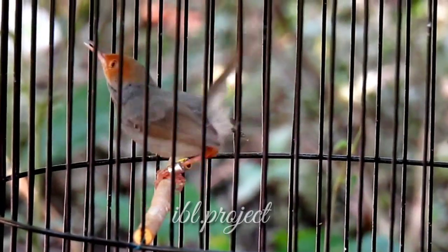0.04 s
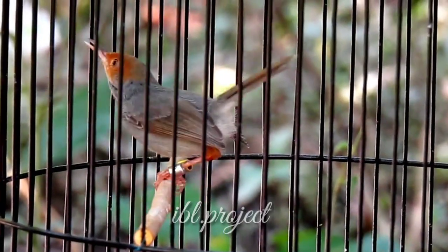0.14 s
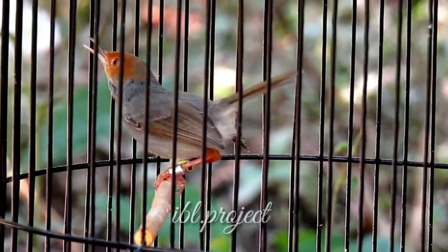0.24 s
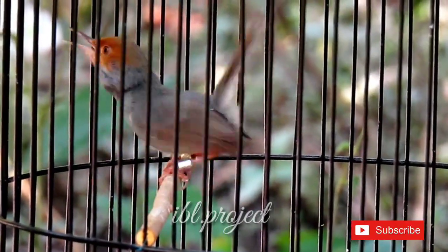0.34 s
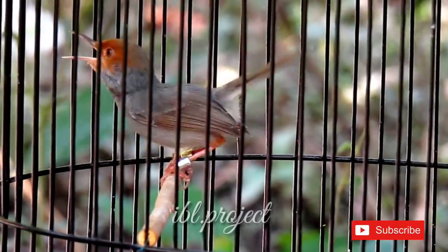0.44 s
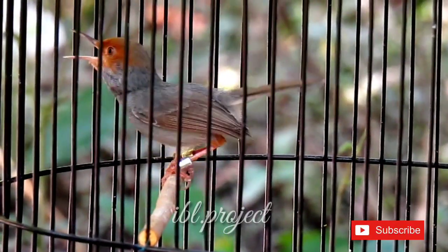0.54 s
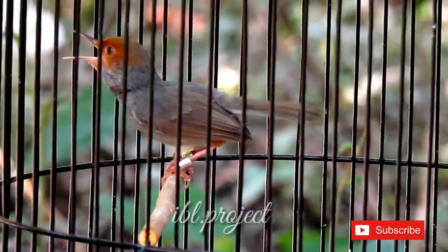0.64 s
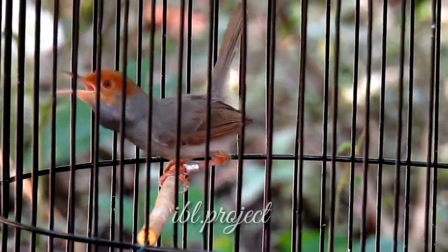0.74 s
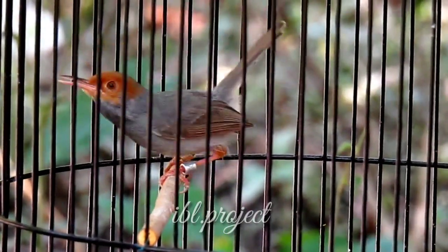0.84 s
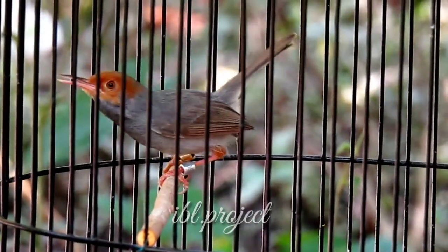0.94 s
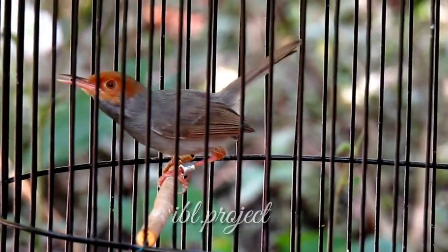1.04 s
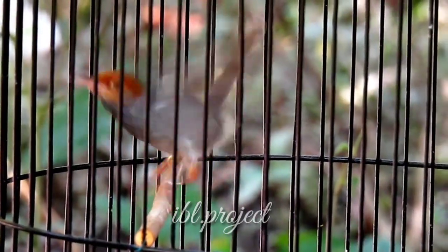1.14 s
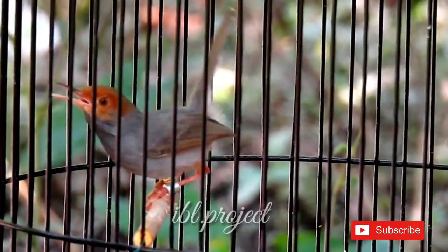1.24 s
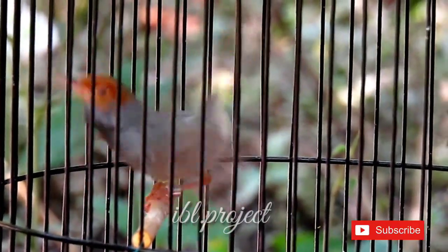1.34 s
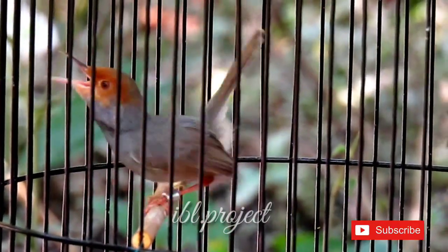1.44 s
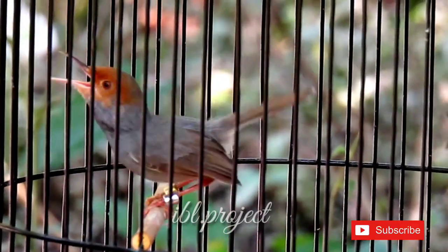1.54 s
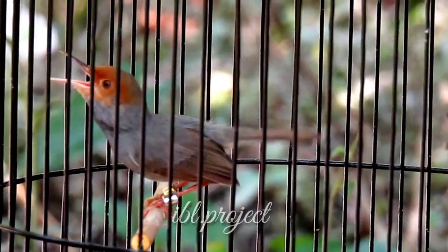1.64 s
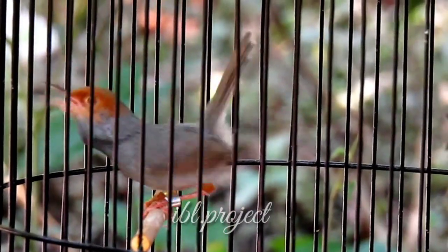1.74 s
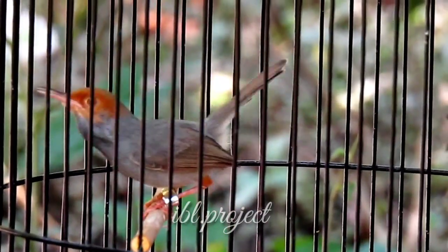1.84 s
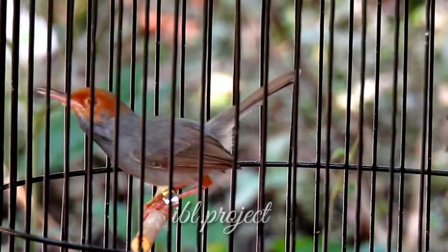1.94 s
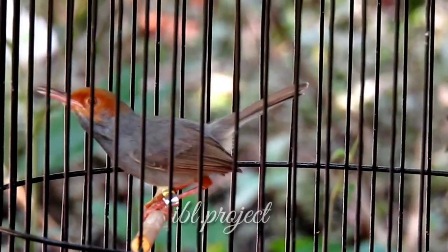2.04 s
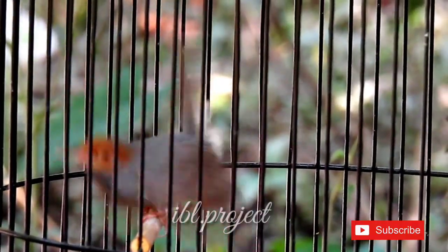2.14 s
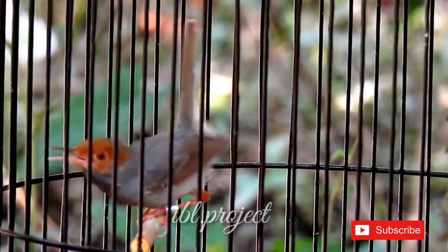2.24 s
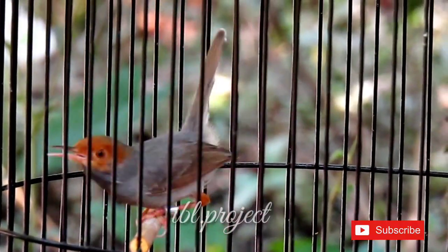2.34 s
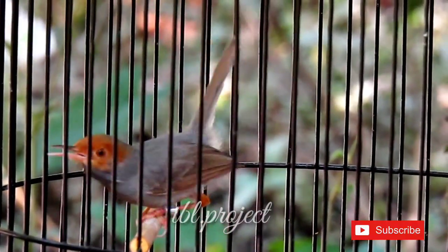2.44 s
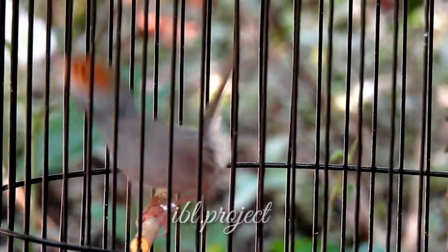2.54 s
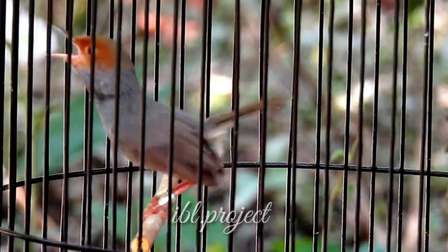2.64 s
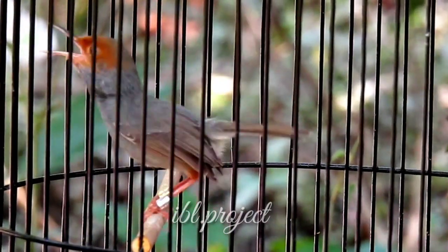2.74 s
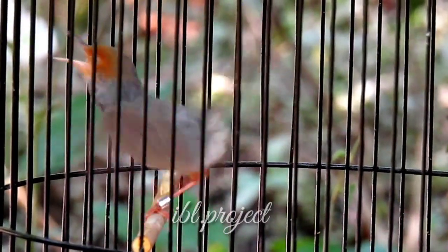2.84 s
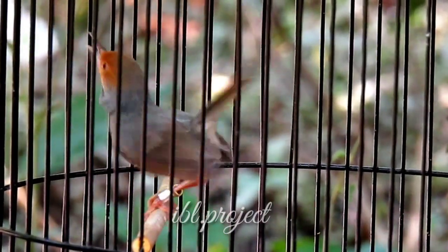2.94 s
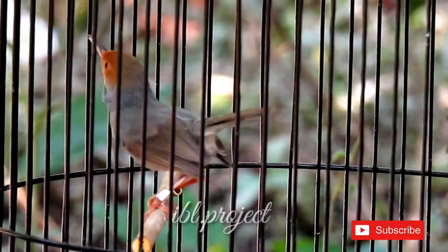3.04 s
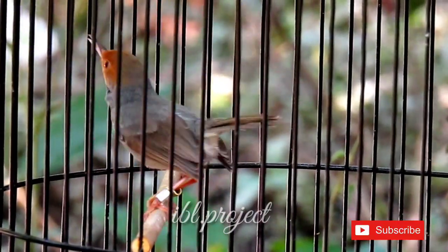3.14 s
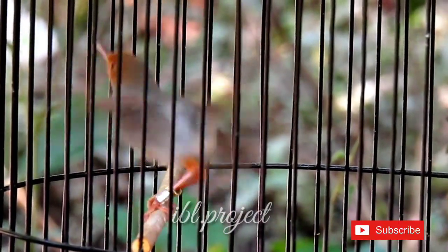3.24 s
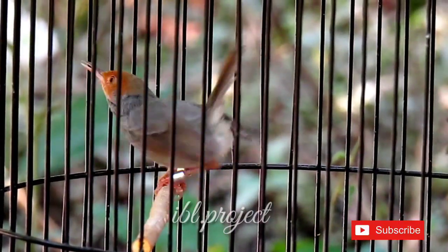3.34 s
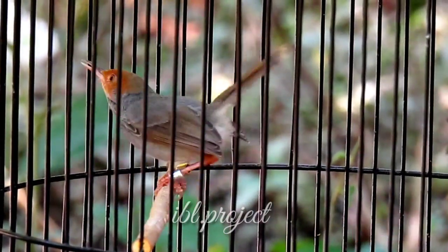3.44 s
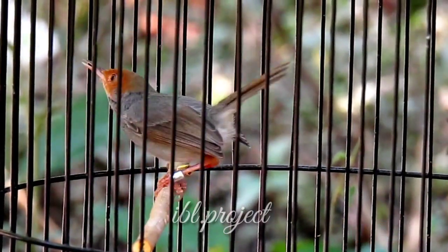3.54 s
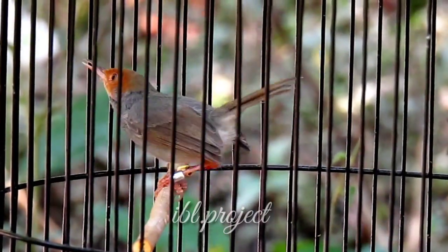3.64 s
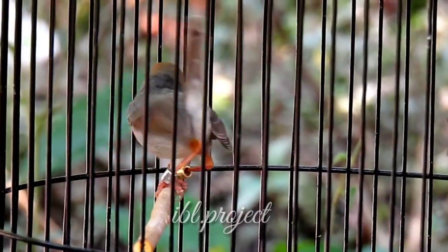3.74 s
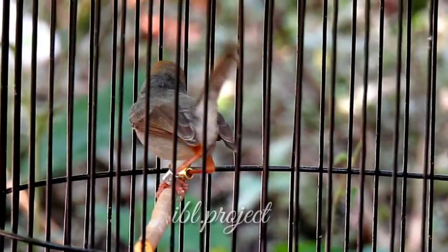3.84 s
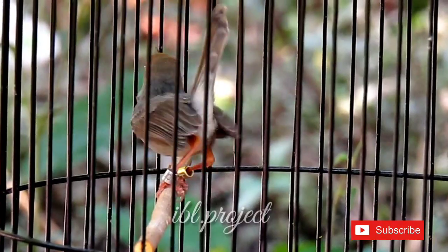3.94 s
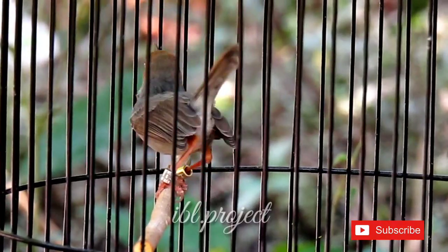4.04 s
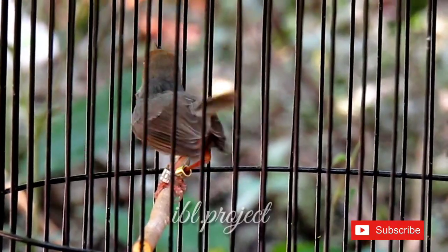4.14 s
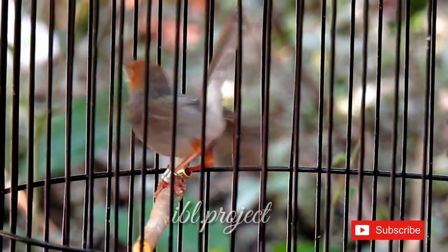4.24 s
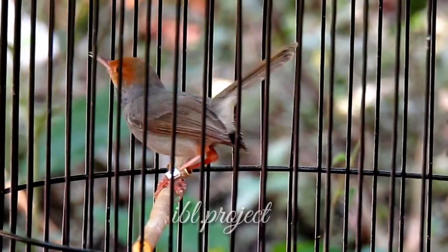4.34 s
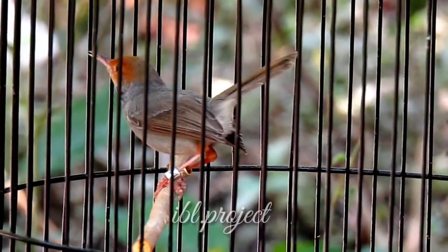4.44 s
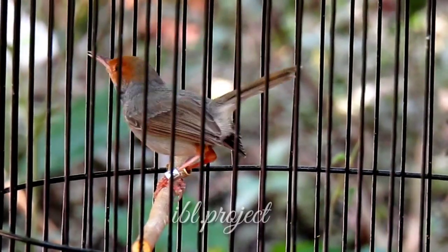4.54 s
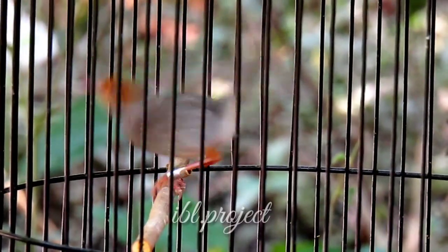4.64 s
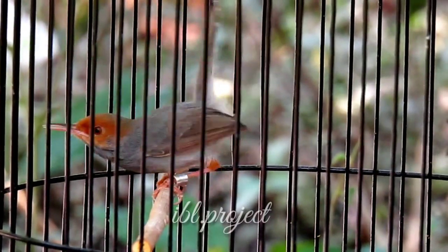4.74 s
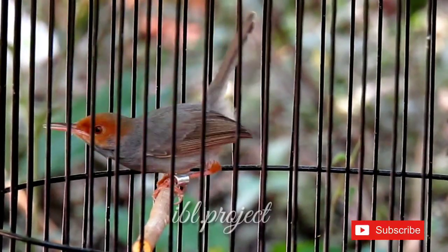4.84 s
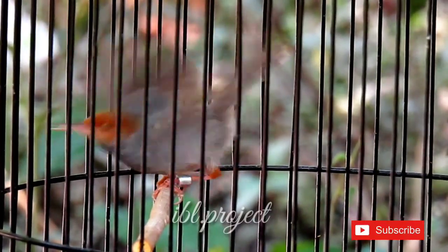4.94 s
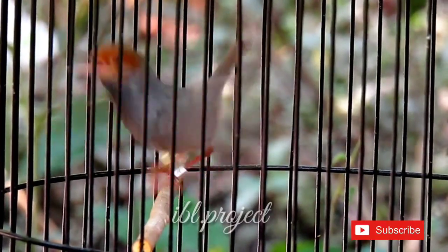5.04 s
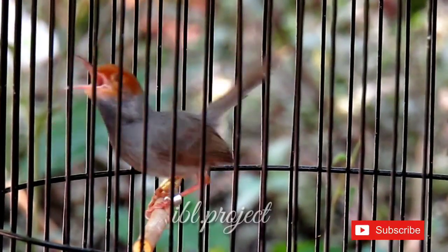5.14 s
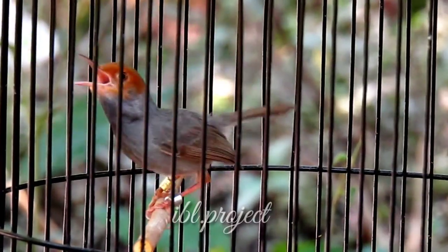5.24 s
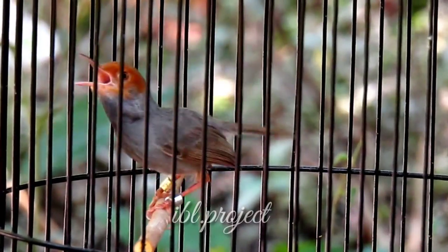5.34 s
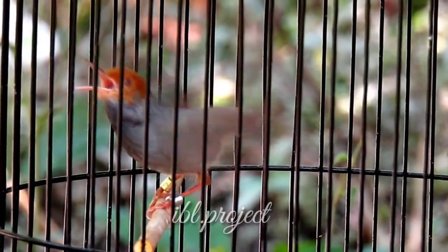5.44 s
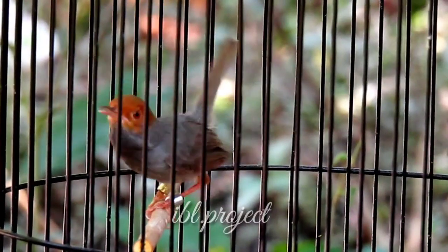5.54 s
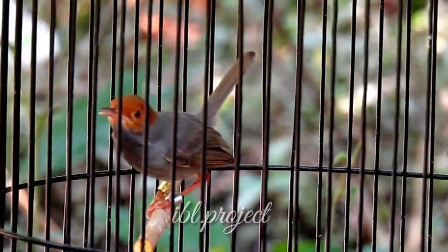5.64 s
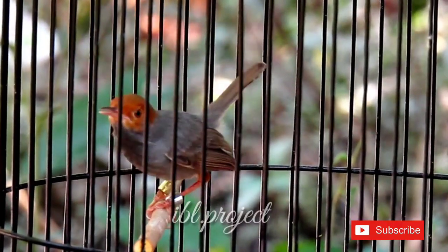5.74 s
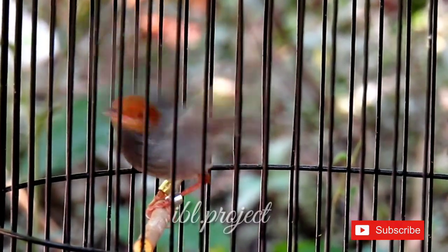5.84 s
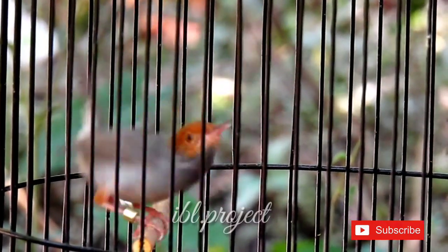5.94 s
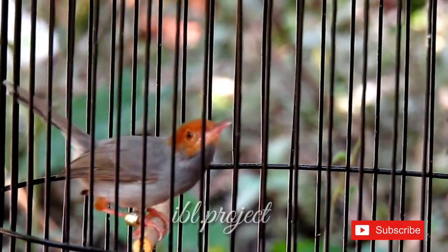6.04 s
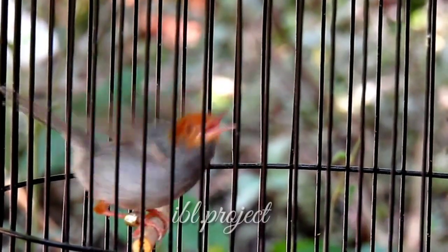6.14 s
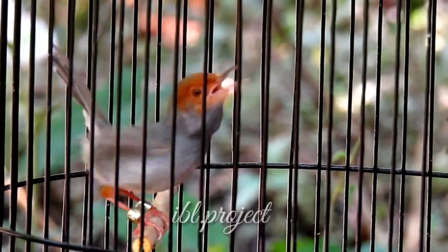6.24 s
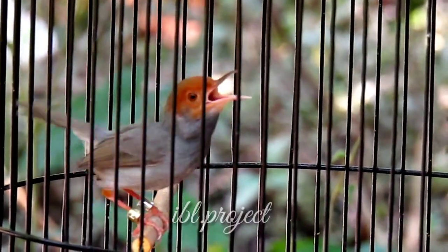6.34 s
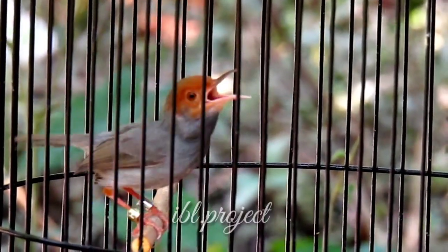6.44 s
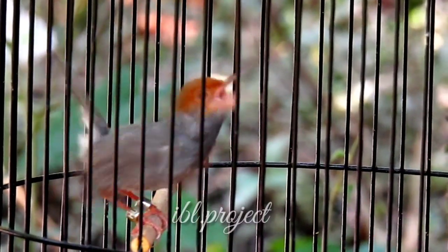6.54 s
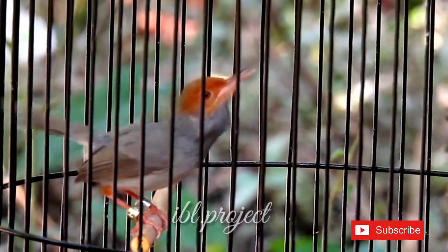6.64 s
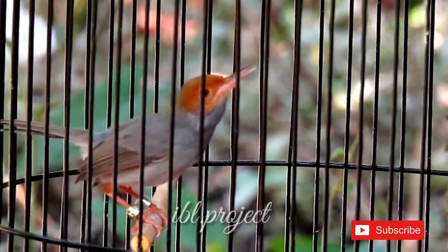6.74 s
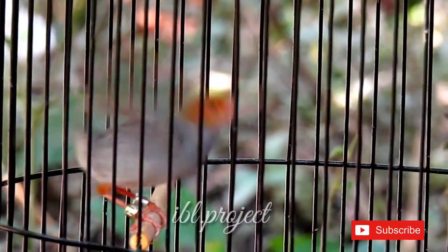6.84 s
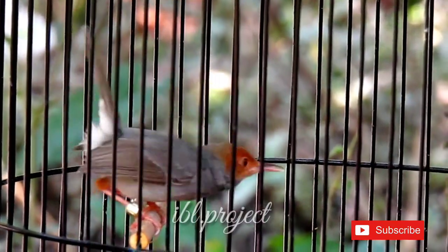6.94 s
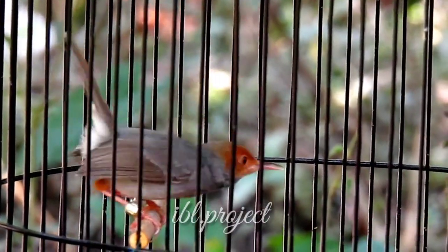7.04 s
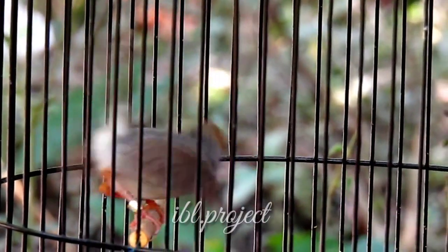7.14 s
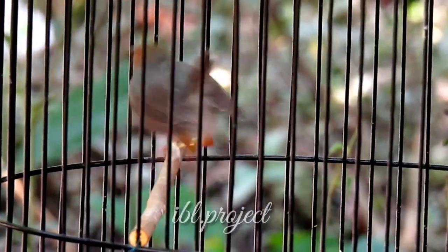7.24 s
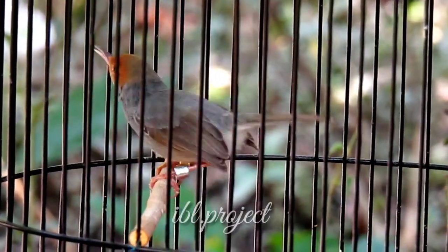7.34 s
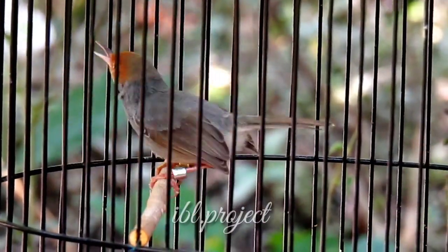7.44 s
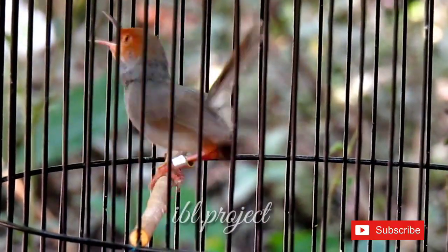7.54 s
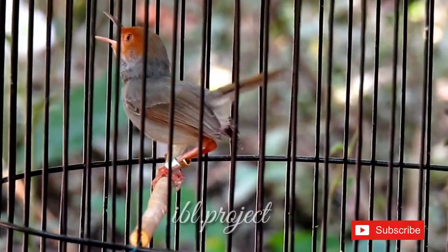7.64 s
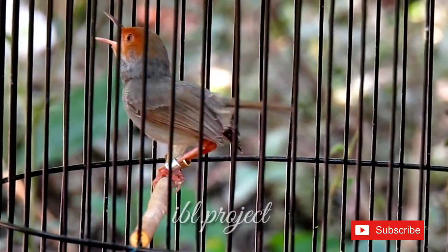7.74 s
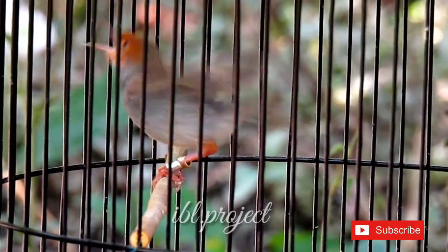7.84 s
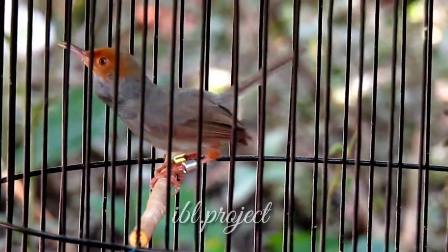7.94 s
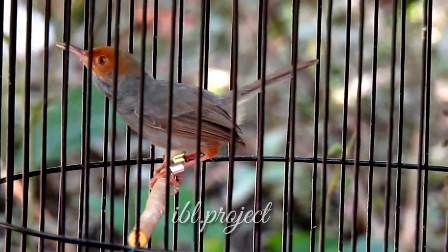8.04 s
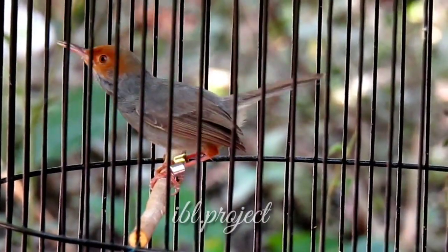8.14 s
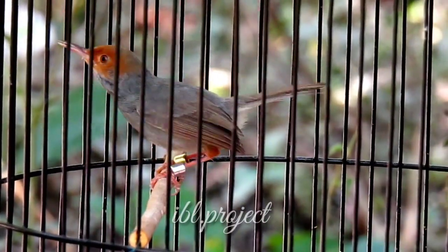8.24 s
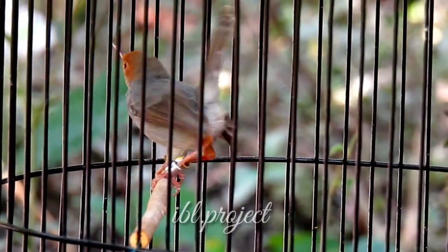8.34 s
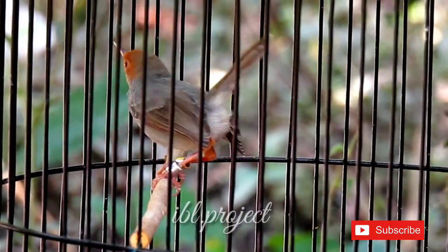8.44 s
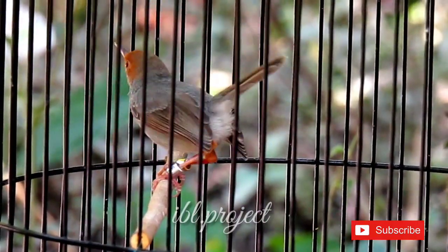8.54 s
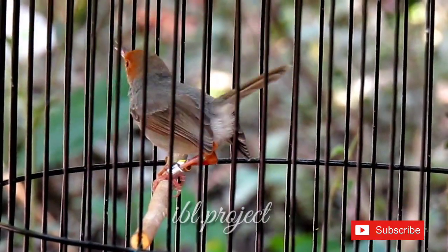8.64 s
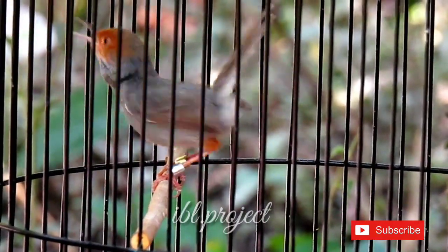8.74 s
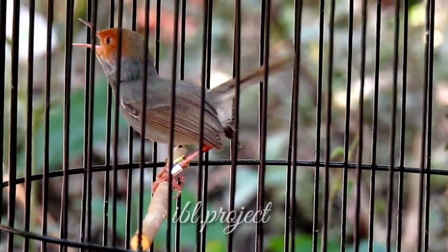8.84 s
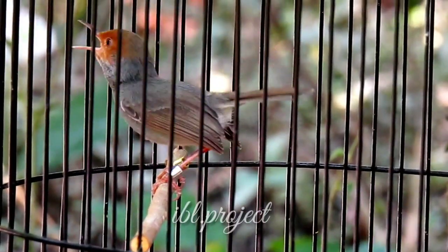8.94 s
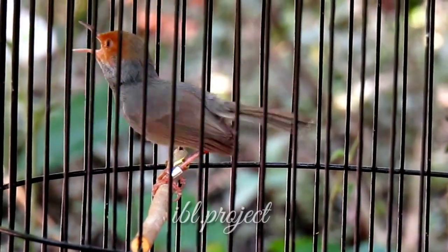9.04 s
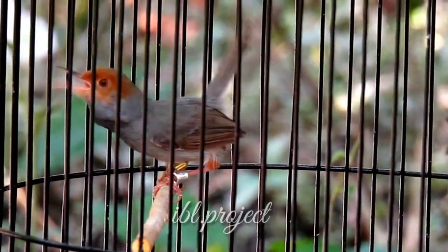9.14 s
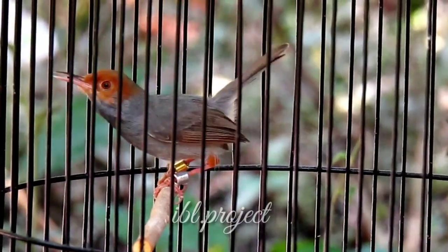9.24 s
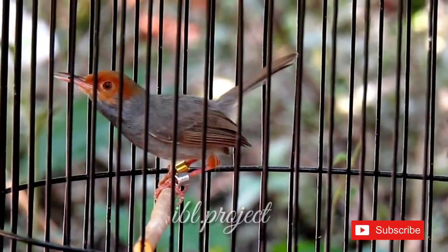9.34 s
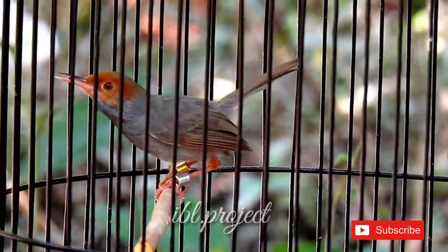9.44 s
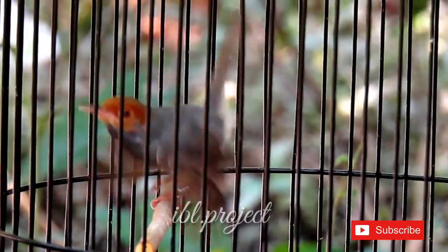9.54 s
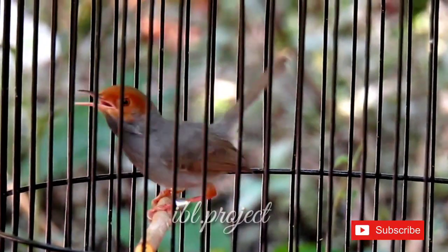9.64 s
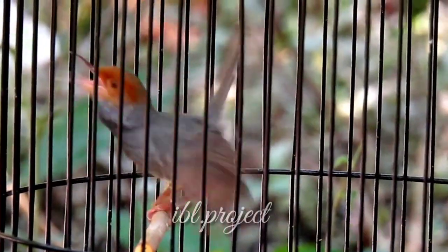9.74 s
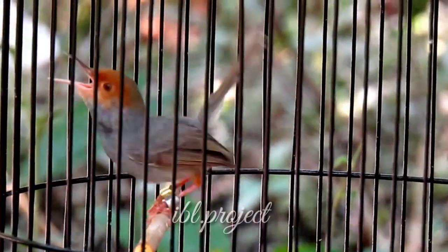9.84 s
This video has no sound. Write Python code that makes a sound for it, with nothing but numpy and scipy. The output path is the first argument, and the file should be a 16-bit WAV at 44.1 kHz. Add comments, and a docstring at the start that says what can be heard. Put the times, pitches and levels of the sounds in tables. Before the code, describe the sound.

Outdoors in a leafy yard, a caged songbird repeats one piercing three-part call, nearly identical each time, dry and close with light reflections from nearby surfaces. Between calls there is soft open air and distant traffic, quieter in the middle and stronger at the end. A faint rooster crow, tiny peeps and a few rough far-off squawks fill the background.

```python
"""A caged tailorbird repeats one call close to the microphone: a soft upward flick, a held whistle, a loud falling chip.
Its notes are partials on drawn pitch curves, with noise for rasp and clicks; cage and yard walls answer.
Far off a rooster crows and other birds peep in gliding tones, hoarse squawks are noise through resonances,
and traffic rumbles under open air as two coloured noises. The recorder adds a thin whine and limits the peaks."""
import sys
import numpy as np
from scipy import signal
from scipy.fft import rfft, irfft, next_fast_len
from scipy.io import wavfile
from scipy.ndimage import uniform_filter1d, minimum_filter1d, map_coordinates

SR = 44100
rng = np.random.default_rng(int(sys.argv[2]) if len(sys.argv) > 2 else 0)


def to_wav(s):
    """Save 16-bit WAV."""
    ch = np.atleast_2d(s).T  # columns
    pcm = np.round(np.clip(ch, -1, 1) * 32767)  # PCM
    wavfile.write(sys.argv[1], SR, pcm.astype(np.int16))


N = 437031  # samples


def amp(db):
    """Decibels to gain."""
    return 10 ** (np.asarray(db) / 20)


def unit(x):
    """Scale to rms 1."""
    return x / np.sqrt(np.mean(x ** 2) + 1e-20)


def along(points, hz):
    """Read (hz, value) points on a log frequency axis."""
    point_hz, values = np.transpose(points)
    return np.interp(np.log(hz + 1), np.log(point_hz + 1), values)


def curves(rows, t):
    """Each column after the first, read at t."""
    s, *columns = np.transpose(rows)
    return [np.interp(t, s, column) for column in columns]


def clock(length_s):
    """Sample times of a sound."""
    return np.arange(int(length_s * SR)) / SR


def wobble(t, rate):
    """A smooth random curve, rate knots a second."""
    knots = rng.standard_normal(int(t[-1] * rate) + 4)
    return map_coordinates(knots, [t * rate])


def filtered(x, response):
    """x times a response of frequency."""
    m = next_fast_len(N + SR // 2)
    spectrum = rfft(x, m) * response(np.fft.rfftfreq(m, 1 / SR))
    return irfft(spectrum, m)[:N]


def noise(spectrum):
    """Coloured noise of rms 1."""
    white = rng.standard_normal(N)
    return unit(filtered(white, lambda hz: amp(along(spectrum, hz))))


def add(track, s, sound):
    """Mix a sound in at time s."""
    part = track[max(round(s * SR), 0):][:len(sound)]
    part += sound[:len(part)]


def tone(pitch, partials):
    """Partials riding on one pitch curve, silent above half the sample rate."""
    phase = 2 * np.pi * np.cumsum(pitch) / SR
    return np.sqrt(2) * sum(amp(db) * np.sin(k * phase) * (k * pitch < SR / 2) for k, db in partials)


def arch(t):
    """A rounded rise and fall."""
    return np.sqrt(np.abs(np.sin(np.pi * t / t[-1])))


# Colour of the far traffic: pitch_hz, relative_level_db
RUMBLE = [(13, -43), (22, -9.5), (42, -3), (58, -4.5), (78, 5), (100, 1), (150, 3), (177, -1), (400, -12.5),
          (520, -37.5), (880, -120)]
# Colour of the open air: pitch_hz, relative_level_db
AIR = [(100, -5), (300, -1.5), (500, -1), (750, -3), (1100, -5), (1600, -9), (2200, -7.5), (3000, -11.5),
       (4000, -14.5), (5000, -18.5), (6500, -20.5), (10500, -25), (13000, -25), (15000, -44)]
# The traffic ebbs to a lull and builds again: time_s, rumble_level_db, air_level_db
TRAFFIC = [(.2, -46, -49.5), (1.9, -51.5, -51), (2.55, -50, -50), (3.05, -53, -53), (4.15, -50.5, -50.5),
           (5.1, -52.5, -51), (5.6, -56, -54.5), (6.65, -55, -55), (7.5, -49.5, -51), (8.3, -51, -51),
           (9.4, -47.5, -51), (9.8, -44, -48)]


def background():
    """Distant traffic and open air ebb and build; small random swells move the rumble only."""
    t = np.arange(N) / SR
    rumble_db, air_db = curves(TRAFFIC, t)
    swell_db = 0.86 * wobble(t, 3.6)
    rumble = amp(rumble_db + swell_db) * noise(RUMBLE)
    air = amp(air_db) * noise(AIR)
    return rumble + air


# Hoarse squawks far off, before the distance mix: start_s, length_s, level_db
SQUAWKS = [(2.314, 0.31, -47), (5.093, .25, -49), (7.075, 0.33, -50.5), (8.243, 0.25, -58),
           (8.641, 0.16, -53.5), (8.92, 0.34, -49)]
# Resonances of the squawking throat: centre_hz, width_hz, level_db
SQUAWK_THROAT = [(755, 69, -25.5), (1093, 140, 9), (1492, 110, 4), (2120, 150, -0.5)]


def throat(hz):
    """Resonances side by side, summed with alternating sign."""
    total = 0
    for k, (centre, width, db) in enumerate(SQUAWK_THROAT):
        damping = 1j * hz * width
        total = total + (-1) ** k * amp(db) * damping / (centre * centre - hz * hz + damping)
    return total


def squawks():
    """Hoarse rasps: noise through a few throat resonances, dulled by distance."""
    level = np.zeros(N)
    for s, length, db in SQUAWKS:
        add(level, s, amp(db) * arch(clock(length)))
    white = rng.standard_normal(N)
    return level * unit(filtered(white, lambda hz: throat(hz) / (1 + (hz / 3200) ** 4)))


def glides(notes, partials, rough, flutter_db):
    """Gliding notes, unsteady in pitch and level."""
    track = np.zeros(N)
    for s, length, start_hz, end_hz, db in notes:
        t = clock(length)
        pitch = np.linspace(start_hz, end_hz, len(t)) * (1 + rough * wobble(t, 160))
        level = amp(db + flutter_db * wobble(t, 25)) * arch(t)
        add(track, s, level * tone(pitch, partials))
    return track


# Syllables of the far rooster, before the distance mix: start_s, length_s, start_pitch_hz, end_pitch_hz, level_db
CROW = [(1.8, .12, 690, 714, -53), (2.05, .54, 746, 753, -48.5), (2.6, .7, 720, 680.7, -56.5),
        (3.2, .32, 698, 664, -54.5), (8.63, .12, 772, 733, -51.5)]
# Partials of the crow: multiple_of_pitch, level_db
CROW_PARTIALS = [(1, -1), (2, 0.5), (3, -18)]


def rooster():
    """A distant crow: slow glides of three partials with a strong flutter."""
    return glides(CROW, CROW_PARTIALS, rough=.02, flutter_db=2.5)


# Single peeps out in the yard: start_s, length_s, start_pitch_hz, end_pitch_hz, level_db
PEEPS = [(.31, .07, 3900, 3550, -50.5), (.34, 0.084, 3450, 3150, -46), (4.72, .015, 5000, 4746, -56),
         (4.82, 0.044, 4260, 4100, -57.5), (6.95, .04, 4240, 4040, -56), (7.057, 0.011, 5000, 4750, -55),
         (7.15, .18, 2270, 2193, -56.5), (9.72, 0.071, 2243, 2156, -48)]
# Evenly repeated peeps:
# first_s, gap_s, notes, length_s, start_pitch_hz, end_pitch_hz, first_level_db, growth_db (per note)
PEEP_RUNS = [(3.53, .23, 4, .06, 2010, 1990, -57, 0), (4.88, .054, 6, .016, 3740, 3520, -58, 1.5)]
# The fundamental alone: multiple_of_pitch, level_db
PURE = [(1, 0)]


def other_birds():
    """Single peeps and evenly spaced runs of them, each one gliding partial."""
    runs = []
    for first, gap, notes, length, start_hz, end_hz, db, growth_db in PEEP_RUNS:
        for k in range(notes):
            runs.append((first + k * gap, length, start_hz, end_hz, db + k * growth_db))
    return glides(PEEPS + runs, PURE, rough=.016, flutter_db=1)


# The near bird's soft flick, which opens each call: start_s, length_s, level_db
FLICKS = [(0.448, .021, -15.5), (1.502, .021, -15), (2.700, 0.019, -13), (3.988, .02, -15.5),
          (5.225, 0.015, -19.5), (6.337, 0.011, -15), (7.63, .021, -16), (8.85, .021, -15.5),
          (9.854, .021, -14)]
# Decay of the yard's echo: pitch_hz, t60_s
YARD = [(500, 0.14), (3000, 0.44), (4200, 0.4), (8000, 0.23), (15000, 0.1)]


def yard(x):
    """The diffuse echo of the yard, decaying noise drawn anew for every call; treble dies first above 3 kHz."""
    echo = np.zeros(N)
    edges = [0] + [round(row[0] * SR) for row in FLICKS] + [N]
    for a, b in zip(edges, edges[1:]):
        hz, t, z = signal.stft(rng.standard_normal(int(.8 * SR)), SR, nperseg=256)
        decay = amp(-60 * t / along(YARD, hz)[:, None])
        tail = signal.istft(z * decay, SR, nperseg=256)[1]
        tail = tail * (1 - np.exp(-np.arange(len(tail)) / SR / 0.0072))  # the echo builds up softly
        add(echo, a / SR, signal.fftconvolve(x[a:b], tail / np.linalg.norm(tail)))
    return echo


def near_walls(x, spread, count):
    """A few early echoes from near walls, up to about spread seconds late, drawn anew for every call."""
    echoes = np.zeros(N)
    edges = [round(row[0] * SR) for row in FLICKS] + [N]
    for a, b in zip(edges, edges[1:]):
        delays = .003 + spread * (np.arange(count) + rng.random(count)) / count
        strengths = rng.choice([-1, 1], count) * np.exp(-delays / spread)
        taps = np.bincount((delays * SR).astype(int), strengths)
        add(echoes, a / SR, signal.fftconvolve(x[a:b], taps / np.linalg.norm(taps)))
    return echoes


def cage_echo(x):
    """One reflection, delayed without loss, from a surface just behind the bird."""
    delay_s = .0038
    return filtered(x, lambda hz: np.exp(-2j * np.pi * hz * delay_s))


# Course of one flick: share_of_length, pitch_hz, level_db (added to the flick's own)
FLICK_SHAPE = [(0, 1533, -22), (.25, 1755, -17), (.5, 2010, -19.5), (.76, 2291, -3), (.9, 2700, -14),
               (1, 2910, -29)]
# The octave alone: multiple_of_pitch, level_db
OCTAVE = [(2, 0)]


def flick(length, db):
    """A rough upward sweep; while the pitch is low it is hoarser and its octave also passes the throat."""
    t = clock(length)
    pitch, shape_db = curves(FLICK_SHAPE, t / length)
    roughness = np.interp(t / length, [.5, .75], [.1, .06])
    pitch = pitch * (1 + roughness * wobble(t, 800))
    octave = np.interp(pitch, [1450, 2000], [.5, .015])
    voice = tone(pitch, PURE) + octave * tone(pitch, OCTAVE)
    level = amp(db + shape_db + 1.6 * wobble(t, 700))
    return level * voice * (1 - np.exp(-t / 0.00063))


# Pitch course of the whistle: time_s (after its start), multiple_of_held_pitch
WHISTLE_BEND = [(0, .84), (.004, .95), (.011, 1.015), (.02, 1.07), (.035, 1.035), (.06, 1.042), (.1, 1.017),
                (.16, 1.003), (.23, .998), (.3, 1.005)]
# Partials of the whistle: multiple_of_pitch, level_db
WHISTLE_PARTIALS = [(1, 0), (2, -40), (3, -51)]
# Partials that grow as the whistle is pressed: multiple_of_pitch, level_db (before the strain)
STRAIN_PARTIALS = [(.5, -42.5), (1.5, -26), (2.5, -44.5), (3.5, -52), (4, -44)]
# Partials that brighten the forced start: multiple_of_pitch, level_db (at the start)
ATTACK_PARTIALS = [(1.5, -42.5), (2, -42), (3, -48)]
# Times of full force, of its end and of the relaxed note; level of the held note
ATTACK_S, ATTACK_HOLD_S, RELAX_S, HELD_DB = .008, .014, 0.019, -25.5
SWELL_S, RELEASE_S, RELEASE_DB = 0.024, 0.018, 20  # the last swell's rise, its fall and how far it drops
# Pitch unsteadiness at the start (share of the pitch), its fading time; level flutter throughout
QUIVER, QUIVER_S, FLUTTER_DB = 0.023, 0.051, 1
BRIGHT_S = .03  # fading time of the bright start


def whistle(start, swell, held_hz, attack_db, late_db, swell_db):
    """A hard attack relaxes into a held note that swells and lifts just before it stops."""
    peak = swell - start
    end = peak + .07
    t = clock(end)
    effort = [(0, attack_db - 13), (ATTACK_S, attack_db), (ATTACK_HOLD_S, attack_db),
              (RELAX_S, HELD_DB + 3.5), (.1, HELD_DB),
              (peak - .04, late_db), (peak - SWELL_S, late_db + 3), (peak, swell_db),
              (peak + RELEASE_S, swell_db - RELEASE_DB), (end, swell_db - 40.5)]
    effort_db, = curves(effort, t)
    bend, = curves(WHISTLE_BEND, t)
    lift = .026 * np.exp(-((t - peak - .008) / 0.011) ** 2)
    # the voice quivers at first and steadies to a pure tone
    quiver = np.exp(-t / QUIVER_S)
    pitch = held_hz * (bend + lift + (QUIVER * quiver + .0008) * wobble(t, 550))
    flutter_db = 2 * quiver * wobble(t, 370) + FLUTTER_DB * wobble(t, 45)
    # as the note is pressed harder, every second cycle differs and the edge brightens
    strain_db = np.interp(t, [.09, .17, peak - .025, peak + 0.0018], [-12.5, -4.0, 6.5, -13])
    strain_db = strain_db + 2 * wobble(t, 48)
    voice = tone(pitch, WHISTLE_PARTIALS)
    voice = voice + amp(strain_db) * tone(pitch, STRAIN_PARTIALS)
    voice = voice + np.exp(-t / BRIGHT_S) * tone(pitch, ATTACK_PARTIALS)
    return amp(effort_db + flutter_db) * voice * (1 - np.exp(-t / 0.00046))


# Course of one chip: stage (0 start, 1 trough, 2 crest, 3 end), pitch_hz, level_db (added to the chip's own)
CHIP_SHAPE = [(0, 4250, -10), (.2, 3900, -1), (.6, 3150, -3), (1, 2610, -2), (1.3, 2720, 0),
              (1.65, 2940, 0), (2, 3070, -1), (2.28, 2860, 1), (2.52, 2390, -6.5), (2.77, 1960, -17.5),
              (3, 1420, -38)]
# Partials above and below the chip's pitch: multiple_of_pitch, level_db (at their brightest)
CHIP_OVERTONES = [(.5, -38.5), (2, -37.5), (3, -53.5), (4, -55.5), (5, -48)]
PLUNGE_DB, PLUNGE_S = -12, .003  # the burst that opens every chip: its level, its time to the peak


def chip(trough, crest, length, db):
    """After an opening burst the pitch plunges, rebounds and falls away; the plunge is the brightest part."""
    t = clock(length)
    stage = np.interp(t, [0, trough, crest, length], np.arange(4))
    pitch, shape_db = curves(CHIP_SHAPE, stage)
    pitch = pitch * (1 + 0.013 * wobble(t, 900) + 0.0092 * wobble(t, 54))
    edge = np.interp(stage, [.6, 1.2], [1, .3])
    voice = tone(pitch, PURE) + edge * tone(pitch, CHIP_OVERTONES)
    burst = amp(PLUNGE_DB) * np.exp(-((t - PLUNGE_S) / .002) ** 2)
    level = amp(db + shape_db + 2.6 * wobble(t, 200)) + burst
    return level * voice * (1 - np.exp(-t / .001))


# Whistles close to the microphone: start_s, swell_s, held_pitch_hz, attack_level_db, late_level_db, swell_level_db
WHISTLES = [(.486, .781, 3421, -11, -24, -19), (1.539, 1.805, 3455, -7.5, -21, -10.5),
            (2.741, 3.022, 3433, -9, -26, -12), (4.03, 4.312, 3450, -8.5, -25, -11),
            (5.249, 5.549, 3433, -9, -21, -14), (6.371, 6.65, 3428, -9, -30, -12),
            (7.673, 7.949, 3443, -10.5, -25.5, -11.5), (8.891, 9.172, 3429, -9.5, -22.5, -14.5),
            (9.895, 10.17, 3484, -5, -25, -15)]
# Chips close to the microphone: start_s, trough_s, crest_s (both after the start), length_s, level_db
CHIPS = [(0.829, 0.019, .044, .083, -11.5), (1.872, 0.015, .026, 0.074, -14.5),
         (3.087, 0.011, .031, .071, -13), (4.37, .010, .024, .060, -13.5), (5.593, .016, .040, .079, -16),
         (6.712, 0.011, .031, .071, -14), (8.008, .019, .043, 0.075, -13), (9.236, .013, .028, .068, -12.5)]
# Colour of the turbulence in the voice: pitch_hz, relative_level_db
RASP = [(1200, -22.5), (2500, -1), (4200, 2), (5200, -0.5), (7500, -10), (11000, -14.5), (12800, -15.5),
        (14300, -9.5)]


def tailorbird():
    """Flick, whistle and chip of every call; the loud notes break loose with a tiny click and rasp at first."""
    song, clicks, onsets = np.zeros((3, N))
    snap = np.exp(-clock(.02) / .003)
    opening = np.ones_like(clock(.1))
    for s, length, db in FLICKS:
        add(song, s, flick(length, db))
    for s, *shape in WHISTLES:
        add(song, s, whistle(s, *shape))
        add(clicks, s, amp(-47) * snap)
        add(onsets, s, amp(-5) * opening)
    for s, *shape in CHIPS:
        add(song, s, chip(*shape))
        add(clicks, s, amp(-33) * snap)
        add(onsets, s, opening)
    power = uniform_filter1d(song ** 2, size=90)
    overdrive = onsets * np.maximum(power - .03, 0)  # only the hardest notes rasp
    return song + (amp(-24) * overdrive + clicks) * noise(RASP)


def scene():
    """The near bird is mostly direct sound, the far ones carry more echo."""
    bird = tailorbird()
    peeps = other_birds()
    far = rooster() + squawks()
    direct = bird + peeps + amp(-1.5) * far
    early = amp(-17.5) * cage_echo(bird) + amp(-9.0) * near_walls(bird, spread=.035, count=12)
    late = yard(amp(-18.5) * bird + amp(-8.5) * peeps + amp(-3) * far)
    return (direct + early + late + background())[None]


def record(dry):
    """The recorder: a thin electronic whine, a fast peak limiter and the band limit."""
    whine_hz, ceiling, top_hz = 11816, .67, 15200
    x = dry[0] + amp(-71) * np.sin(2 * np.pi * whine_hz * np.arange(N) / SR)
    needed = np.minimum(1, ceiling / (np.abs(x) + 1e-9))
    # the gain ducks around each peak and is smoothed over 161 samples
    gain = uniform_filter1d(minimum_filter1d(needed, size=161), size=161)
    return filtered(x * gain, lambda hz: hz < top_hz)[None]


dry = scene()
out = record(dry)
to_wav(out)
```